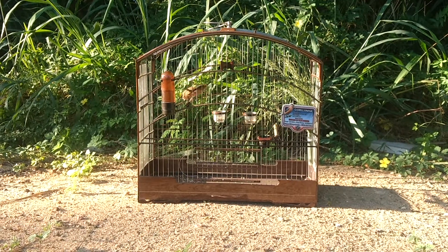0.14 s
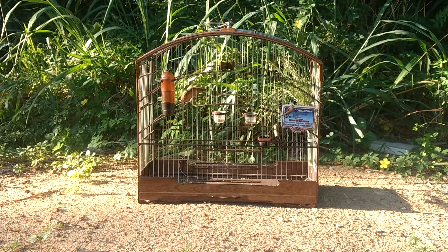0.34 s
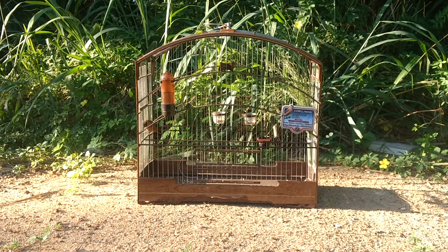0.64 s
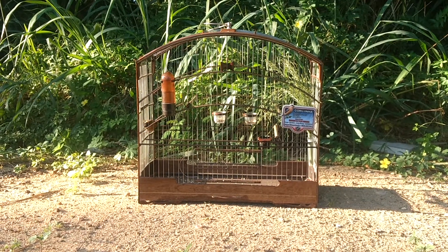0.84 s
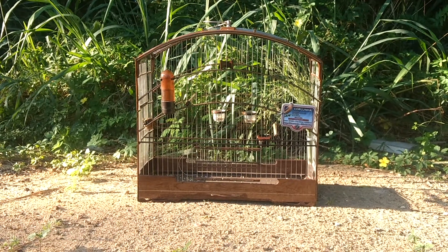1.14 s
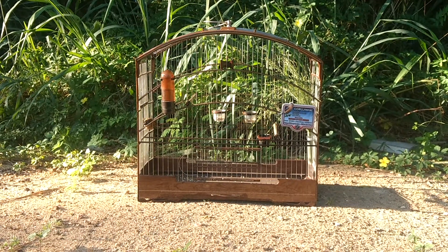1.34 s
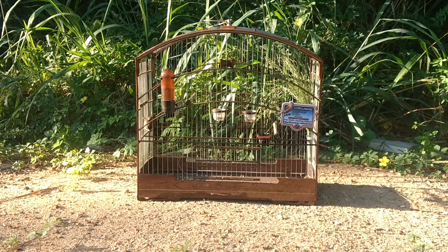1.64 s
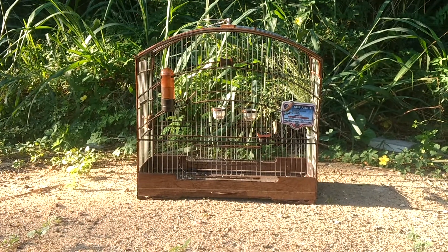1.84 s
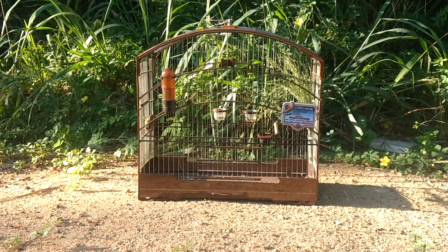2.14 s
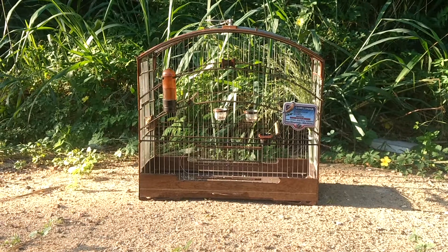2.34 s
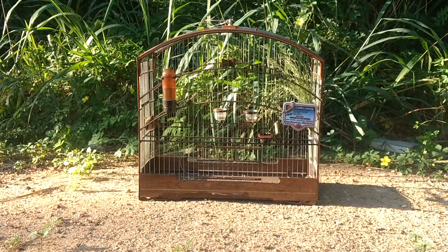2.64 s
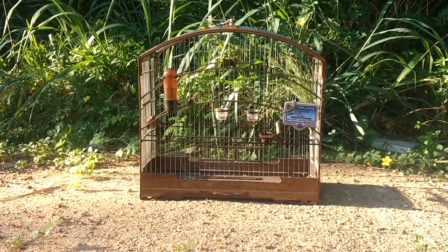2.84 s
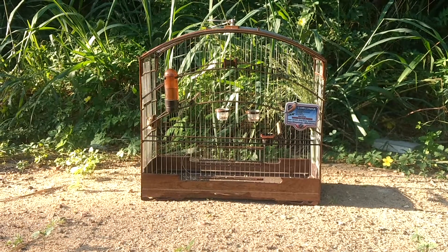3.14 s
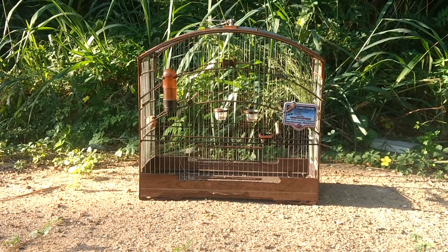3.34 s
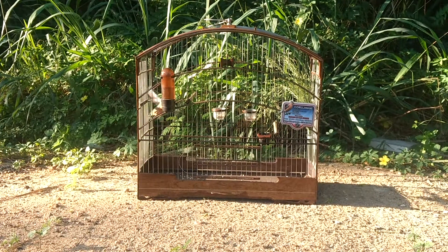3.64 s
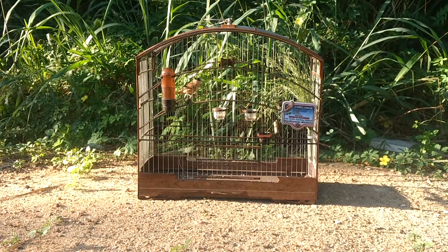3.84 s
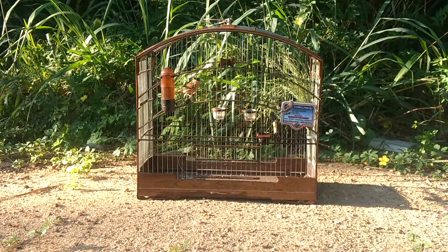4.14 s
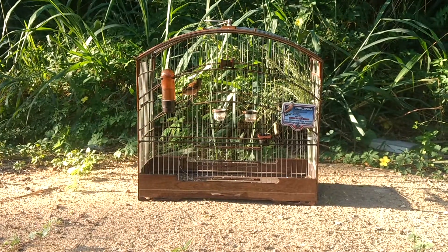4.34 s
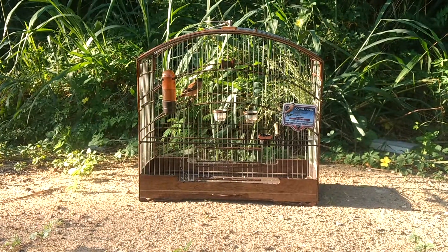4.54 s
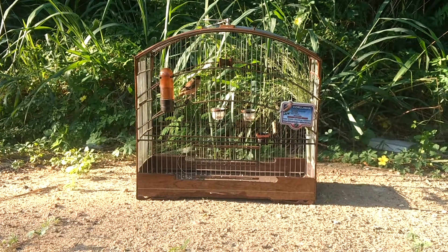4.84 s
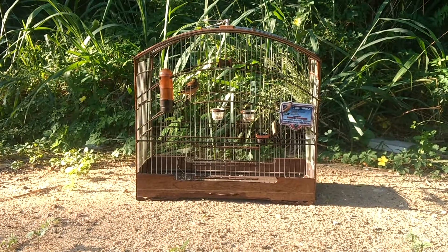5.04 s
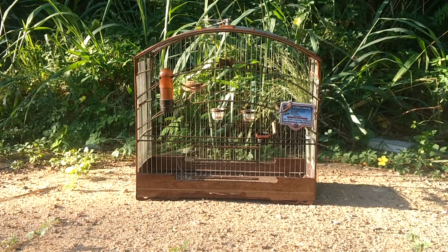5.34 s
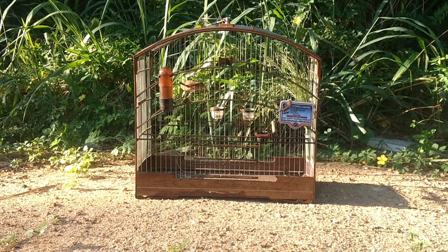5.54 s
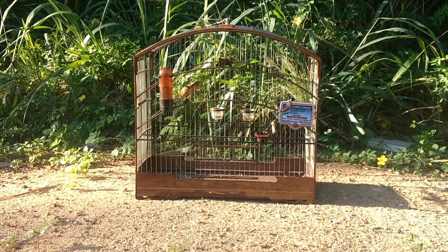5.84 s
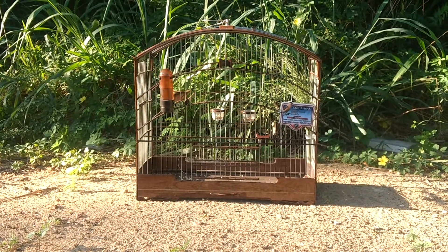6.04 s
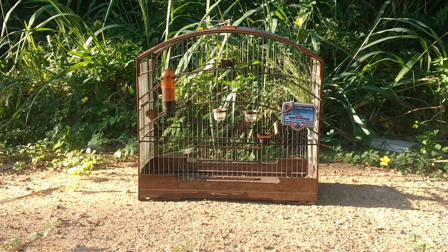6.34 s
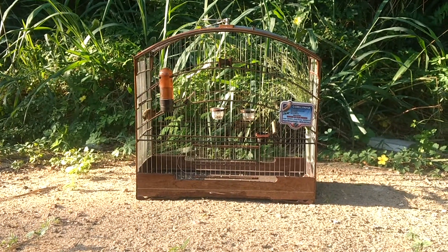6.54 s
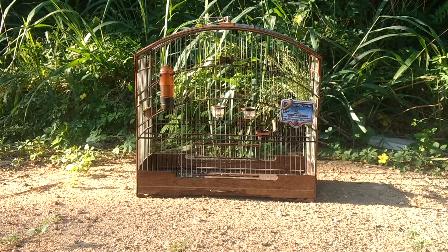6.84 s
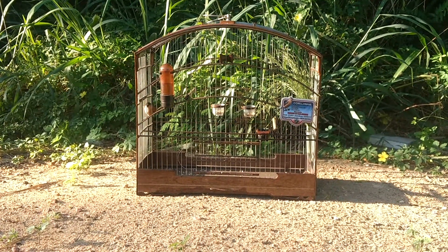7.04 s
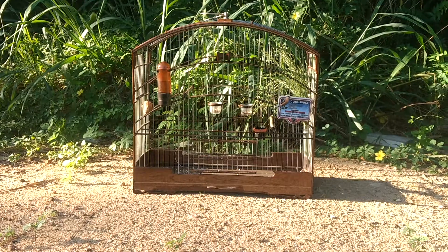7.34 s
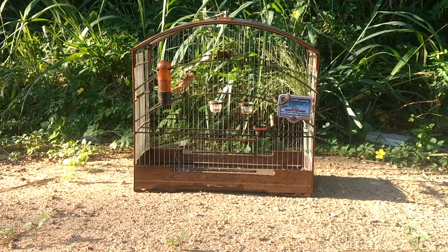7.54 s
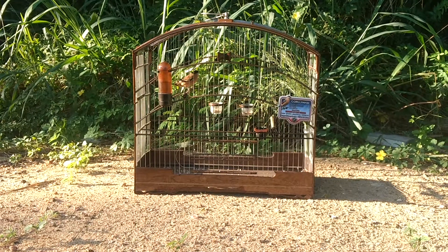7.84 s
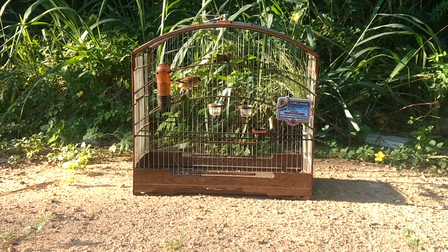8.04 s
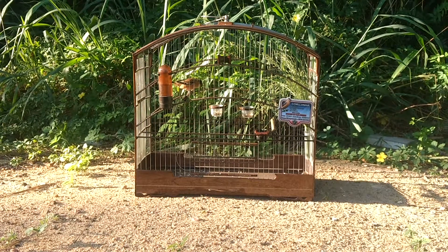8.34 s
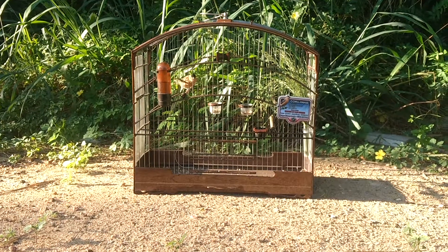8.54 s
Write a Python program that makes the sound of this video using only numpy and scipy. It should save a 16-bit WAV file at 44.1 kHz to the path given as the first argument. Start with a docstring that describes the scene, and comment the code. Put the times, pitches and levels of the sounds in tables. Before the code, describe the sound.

A small bird in a wire cage outdoors starts with short chirps, buzzy notes and soft ticks. About halfway, a trill and a rasp lead into one loud downward whistle. Another trill follows, then a quick run of sharp notes and a last trill. Insects hold one high pitch over a low rumble of distant traffic, and a far motor faintly pulls away. The sound is very wide, with light reflections.

```python
"""A finch sings in a wire cage on a sunny path; ground, cage and a bank of tall plants reflect it.
Insects drone at one pitch over distant traffic throughout. A far whine fades in the first second,
as the bird starts on short notes, buzzes and soft ticks. Near 4 s a trill and a rasp lead to one
loud falling whistle. A distant motor pulls away; from 6.3 s comes a quick run of sharp notes, then
a last trill. In the treble, left is a slightly late, inverted twin of right: a very wide sound."""
import sys
import numpy as np
from scipy import signal
from scipy.fft import rfft, irfft, next_fast_len
from scipy.io import wavfile
from scipy.ndimage import uniform_filter1d, map_coordinates

SR = 44100
rng = np.random.default_rng(int(sys.argv[2]) if len(sys.argv) > 2 else 0)


def to_wav(sig):
    """Store sig (one row per channel, or 1-D mono) as 16-bit WAV at the path in sys.argv[1].

    Samples outside -1..1 are clipped; the rate is SR.
    """
    pcm = np.clip(np.atleast_2d(sig), -1, 1) * 32767
    pcm = np.round(pcm).astype(np.int16)
    wavfile.write(sys.argv[1], SR, pcm.T)  # frames by channels


N = 383669


def amp(db):
    """Decibels to gain."""
    return 10 ** (np.asarray(db) / 20)


def along(points, hz):
    """Read (Hz, value) points on a log axis."""
    point_hz, values = np.transpose(points)
    return np.interp(np.log(hz + 1), np.log(point_hz), values)


def wobble(rate_hz, size):
    """Smooth random curve, rate_hz knots a second."""
    knots = np.random.default_rng(rng.integers(2 ** 31)).standard_normal(int(size * rate_hz / SR) + 4)
    return map_coordinates(knots, [np.arange(size) * rate_hz / SR])


def cycles(hz):
    """Running phase of a frequency curve, in radians."""
    return 2 * np.pi * np.cumsum(hz) / SR


def filtered(x, response):
    """Apply a frequency response to x."""
    size = next_fast_len(N + SR // 2)
    return irfft(rfft(x, size) * response(np.fft.rfftfreq(size, 1 / SR)), size)[..., :N]


def add(track, start_s, sound):
    """Mix a sound into the track."""
    start = max(0, round(start_s * SR))
    track[start:start + len(sound)] += sound[:max(0, N - start)]


def stereo_noise(gain):
    """Noise of rms 1 shaped by gain(hz); the channels are least alike in the bass."""
    # Each row: frequency in Hz, left-right coherence.
    coherence = [(60, 0.14), (300, 0.39), (600, 0.66), (1000, 0.94), (3000, 0.83), (6000, 1), (9000, 1)]

    def mid_side_gain(hz):
        angle = np.arccos(np.clip(along(coherence, hz), -1, 1)) / 2
        return gain(hz) * np.array([np.cos(angle), np.sin(angle)])

    mid, side = filtered(rng.standard_normal((2, N)), mid_side_gain)
    noise = np.array([mid + side, mid - side])
    return noise / np.sqrt(np.mean(noise ** 2))


def arch(crest_s, in_s, out_s, from_hz, main_hz, to_hz, db, bend, fade_db, late=0):
    """Note as (s, Hz, dB) points: pitch bends and level fades off the crest; late delays the peak."""
    u = np.linspace(-1, 1, 41)
    times_s = crest_s + u * np.where(u < 0, in_s, out_s)
    pitch = main_hz + (np.where(u < 0, from_hz, to_hz) - main_hz) * np.abs(u) ** bend
    return np.column_stack([times_s, pitch, db - fade_db * np.abs(u - late) ** bend])


def contour(note, jitter, shimmer_db):
    """Per-sample pitch in Hz and amplitude of a note, both trembling, with soft ends."""
    s, hz, db = np.transpose(note)
    size = max(round((s[-1] - s[0]) * SR), SR // 200)
    t = s[0] + np.arange(size) / SR
    pitch = uniform_filter1d(np.interp(t, s, hz), SR // 250) * (1 + jitter * wobble(350, size))
    ends = np.clip(np.minimum(t - t[0], t[-1] - t) / .0035, 0, 1)
    return pitch, np.sqrt(2) * ends * amp(np.interp(t, s, db) + shimmer_db * wobble(164.5, size))


def roughened(pitch, rough):
    """Irregular vibration shakes the pitch, about 5 % per unit of roughness."""
    return pitch * (1 + .05 * rough * wobble(600, len(pitch)))


def syrinx(pitch, second_db, third_db):
    """The bird's voice: a nearly pure tone with two weak overtones."""
    phase = cycles(pitch)
    return sum(amp(db) * np.sin(k * phase) * (k * pitch < SR / 2)
               for k, db in enumerate((0, second_db, third_db), 1))


def clear_tone(note, second_db, third_db, jitter=.003, break_rough=0):
    """Clean glide; high pitches strain, rough and bright, and may crack between registers."""
    break_hz, break_width_hz, strain_db = 5480, 230, 5
    pitch, level = contour(note, jitter, shimmer_db=.7)
    strain = np.clip((pitch - 4700) / 1800, 0, 1)
    crack = break_rough * np.exp(-((pitch - break_hz) / break_width_hz) ** 2)
    pitch = roughened(pitch, .3 * strain + crack)
    return level * syrinx(pitch, second_db + strain_db * strain, third_db)


def insects(centre_hz=5310, width_hz=300, level_db=-51):
    """A far chorus merges into one narrow, steady band."""
    band = stereo_noise(lambda hz: 1 / (1 + ((hz - centre_hz) / width_hz) ** 2 / 2) ** 2)
    return band * amp(level_db + .28 * wobble(1.78, N))


def engine_hum():
    """A far engine draws nearer; its tones waver in pitch and level."""
    # Each row: frequency in Hz, level at mid-scene in dB, change over the scene in dB.
    tones = [(135.5, -55, 2), (161, -50.8, 5), (258, -58, 0), (314, -55, 8), (478, -67, -4)]
    approach = np.linspace(-.5, .5, N)
    out = np.zeros(N)
    for hz, db, change_db in tones:
        level = np.sqrt(2) * amp(db + change_db * approach + 2 * wobble(5, N))
        out += level * np.sin(cycles(hz + .8 * wobble(5, N)))
    return out


def traffic_and_air(rumble_db=-41.5, rise_db=1.5, air_db=-47.5):
    """Slowly swelling rumble and engine hum, a little to the left, and the even hiss of open air."""
    # Each row: frequency in Hz, relative noise density in dB.
    traffic_spectrum = [(20, -37), (40, -32), (50, -23.5), (65, -13.5), (85, -4), (105, -7.5), (135, -1),
                        (160, 0), (200, -2), (260, -5.5), (400, -11), (600, -16), (1200, -27.5),
                        (3000, -49.5)]
    air_spectrum = [(300, -51), (700, -1.5), (1100, 2), (1900, 1), (2400, -2), (3000, -8.5), (3600, -12.5),
                    (4400, -11.5), (6200, -16), (7000, -21), (7700, -24), (10000, -26.5), (15000, -42)]
    level = amp(rumble_db + np.linspace(0, rise_db, N) + .58 * wobble(7.1, N))
    rumble = level * stereo_noise(lambda hz: amp(along(traffic_spectrum, hz)))
    air = amp(air_db) * stereo_noise(lambda hz: amp(along(air_spectrum, hz)))
    return (rumble + engine_hum()) * amp([[1.3], [-1.3]]) + air


def whine(end_s=.85, from_hz=850, to_hz=806, level_db=-59):
    """A faint, far whine sags in pitch and fades out."""
    out = np.zeros(N)
    pitch, level = contour([(0, from_hz, level_db), (end_s, to_hz, level_db)], jitter=.015, shimmer_db=2)
    add(out, 0, level * signal.windows.tukey(len(level), .3) * np.sin(cycles(pitch)))
    return out


def whistles(thin_above_hz=6700, thin_db_per_octave=55):
    """Clear notes glide through a main pitch; the voice thins at the top of its range."""
    # Each row: crest time, lead-in and lead-out in s, start, main and end pitch in Hz, level in dB.
    notes = [ (.006, 0.0075, .033, 2860, 2620, 1950, -43), (.397, .016, 0.06, 5880, 5570, 5590, -31.5),
             (.45, 0.024, 0.16, 5660, 5590, 5560, -45), (1.953, .012, 0.013, 2870, 2735, 2330, -43.5),
             (6.278, 0.036, .022, 3300, 3600, 3670, -46), (6.582, .014, .016, 3550, 3670, 3700, -37),
             (6.611, 0.022, 0.022, 3720, 3935, 3820, -35), (6.848, 0.0099, .016, 3540, 3630, 3680, -36),
             (6.879, 0.02, 0.026, 3800, 3910, 3900, -34), (6.952, 0.013, 0.018, 5740, 5480, 5530, -37),
             (6.974, .012, 0.01, 4260, 5220, 5150, -27), (6.983, 0.011, 0.011, 5160, 5070, 4800, -24),
             (7.014, 0.024, 0.019, 5100, 5020, 4550, -24), (7.157, 0.064, 0.022, 7600, 6240, 6260, -27.5),
             (7.222, 0.016, 0.029, 4190, 4334, 3220, -28), (7.261, .025, 0.042, 3320, 3316, 2920, -32),
             (7.273, 0.024, 0.03, 2580, 2946, 2340, -32.5), (7.29, 0.012, .012, 4280, 4300, 4250, -41),
             (7.416, .025, .008, 4970, 5280, 4800, -28), (7.424, 0.0068, 0.0078, 6270, 5680, 5330, -30),
             (7.435, 0.015, 0.016, 4940, 4570, 5400, -26.5), (7.456, .009, 0.0074, 4230, 4420, 3800, -20.5),
             (7.474, 0.0096, 0.0088, 4410, 4360, 4370, -30), (7.63, .03, 0.043, 1880, 1954, 2030, -44.5),
             (8.6, 0.1, 0.18, 1880, 2017, 1890, -45.5), ]
    out = np.zeros(N)
    for row in notes:
        s, hz, db = arch(*row, bend=1.4, fade_db=12.5).T
        thinning_db = thin_db_per_octave * np.maximum(np.log2(hz / thin_above_hz), 0)
        note = np.column_stack([s, hz, db - thinning_db])
        add(out, s[0], clear_tone(note, second_db=-35.5, third_db=-37.5, jitter=.011))
    return out


def cheeps():
    """Faint cheeps, each swelling and fading on one straight glide."""
    # Each row: midpoint and length in s, start and end pitch in Hz, level in dB.
    notes = [(.022, .04, 3450, 3080, -49), (0.069, .05, 3030, 2530, -50), (0.245, .026, 4700, 4100, -55),
             (.91, .04, 4600, 4250, -62), (2.365, .03, 4470, 3880, -55), (2.412, 0.04, 4350, 3950, -55),
             (6.012, 0.032, 5800, 5810, -48), (6.105, .025, 4160, 4200, -52),
             (6.155, .022, 4500, 3820, -53), (7.835, 0.051, 6480, 5740, -55.5),
             (7.91, 0.043, 5630, 5970, -53), (8.336, 0.027, 5870, 6780, -49),
             (8.597, 0.023, 5970, 5750, -47.5)]
    out = np.zeros(N)
    for mid_s, length_s, from_hz, to_hz, db in notes:
        mid_hz = (from_hz + to_hz) / 2
        note = arch(mid_s, length_s / 2, length_s / 2, from_hz, mid_hz, to_hz, db, bend=1, fade_db=5.5)
        pitch, level = contour(note, jitter=.025, shimmer_db=2.5)
        add(out, note[0][0], level * np.sin(cycles(pitch)))
    return out


def nasals():
    """A harmonic stack slides through fixed throat resonances; the last note jumps register and back."""
    # Each row: crest time, lead-in and lead-out in s, start, main and end fundamental in Hz,
    # level before the throat in dB, roughness.
    arches = [(.29, .135, .105, 1100, 1520, 1336, -47, 0.52), (4.57, .32, .17, 760, 1113, 826, -44.5, 0.2)]
    # Each row: time in s, fundamental in Hz, level before the throat in dB.
    yodel = [(7.65, 990, -47), (7.684, 1190, -40), (7.704, 1240, -38), (7.711, 1350, -34.5),
             (7.752, 1405, -36), (7.798, 1412, -45), (7.804, 1280, -39), (7.842, 1225, -43.5),
             (7.882, 1030, -49)]
    # Each row: frequency in Hz, throat gain in dB.
    throat = [(1100, -36), (1700, -18), (1970, -1), (2800, 0), (3000, -8), (3450, -13), (3800, -23),
              (4200, -15), (4550, -18), (5000, -32), (6300, -22), (7200, -38), (8400, -42), (13000, -44)]
    out = np.zeros(N)
    notes = [(arch(*shape, bend=2.3, fade_db=7), rough) for *shape, rough in arches]
    for note, rough in notes + [(yodel, 0)]:
        pitch, level = contour(note, jitter=.005, shimmer_db=1.5)
        phase = cycles(roughened(pitch, rough))
        stack = sum(amp(along(throat, k * pitch)) * np.sin(k * phase) for k in range(1, 10))
        add(out, note[0][0], level * stack)
    return out


def buzzes(in_s=.08, out_s=.038, flutter_hz=112, pitch_depth=.064, level_depth=.52):
    """Rising notes; a fast flutter shakes pitch and level, and a faint grainy band rides above."""
    # Each row: start in s, main pitch in Hz, level in dB.
    notes = [(.185, 2510, -48), (1.841, 2840, -57), (6.455, 2940, -41.5), (6.726, 2973, -39.5)]
    out = np.zeros(N)
    for start_s, hz, db in notes:
        note = arch(start_s + in_s, in_s, out_s, .92 * hz, hz, 1.2 * hz, db, bend=1.92, fade_db=7.5)
        pitch, level = contour(note, jitter=.015, shimmer_db=1.3)
        flutter = cycles(flutter_hz * (1 + .045 * wobble(18, len(pitch))))
        tone = syrinx(pitch * (1 + pitch_depth * np.sin(flutter)), second_db=-22.5, third_db=-32)
        grain = amp(-17) * np.sin(cycles(roughened(1.62 * pitch, rough=1)))
        add(out, start_s, level * (1 + level_depth * np.cos(flutter)) * (tone + grain))
    return out


def ticks():
    """Contact calls plunge from a thin top to a faint low tail in about 50 ms."""
    # Each row: crest time in s, base level in dB.
    calls = [(0.237, -64), (0.847, -61), (1.136, -65), (1.428, -64), (1.468, -61), (1.848, -59),
             (2.337, -61.5), (3.077, -57), (3.42, -63), (4.03, -64)]
    out = np.zeros(N)
    for s, db in calls:
        note = [(s - .008, 7300, db - 8), (s, 6400, db + 8),
                (s + .008, 5400, db + 6), (s + .04, 4100, db - 10)]
        pitch, level = contour(note, jitter=.045, shimmer_db=2.5)
        add(out, note[0][0], level * syrinx(pitch, second_db=-25, third_db=-31))
    return out


def squeaks():
    """Strained high notes, brightened by their octave."""
    # Each row: crest time, lead-in and lead-out in s, start, main and end pitch in Hz, level in dB,
    # relative octave level before strain in dB.
    notes = [(.374, 0.014, 0.021, 5400, 6370, 7400, -34.5, -28),
             (5.876, 0.007, 0.025, 7100, 7840, 7260, -48, -20),
             (5.884, .009, .028, 6200, 6540, 6900, -44, -17),
             (7.382, .04, 0.023, 7400, 6930, 7050, -37.5, -24),
             (7.405, 0.0073, .011, 6750, 6880, 7000, -30, -27)]
    out = np.zeros(N)
    for *shape, octave_db in notes:
        note = arch(*shape, bend=1.34, fade_db=12)
        add(out, note[0][0], clear_tone(note, second_db=octave_db, third_db=-36, jitter=.011))
    return out


def held_whistles(scoop_share=.1003, scoop_s=.0392, sag_share=.046):
    """Soft whistles scoop up to pitch, hold their level and sag a little."""
    # Each row: start and length in s, pitch in Hz, level in dB, roughness.
    notes = [(1.456, .122, 2666, -52.5, 0.77), (2.421, 0.14, 2704, -50, 0.01)]
    out = np.zeros(N)
    for start_s, length_s, hz, db, rough in notes:
        t = np.linspace(0, length_s, 40)
        scoop = np.maximum(1 - t / scoop_s, 0)
        glide_hz = hz * (1 - scoop_share * scoop - sag_share * (t / length_s) ** 2)
        note = np.column_stack([start_s + t, glide_hz, db - 4 * scoop])
        pitch, level = contour(note, jitter=.004, shimmer_db=1)
        add(out, start_s, level * np.sin(cycles(roughened(pitch, rough))))
    return out


def slurs():
    """Notes hook up and slide down; the bird pushes hardest after the turn."""
    # Each row: time of the top, lead-in and lead-out in s, start, top and end pitch in Hz, level in dB.
    notes = [(2.229, 0.0142, .049, 3070, 3490, 2324, -42.5), (7.515, .02, .061, 2390, 3510, 1930, -33.5)]
    out = np.zeros(N)
    for row in notes:
        note = arch(*row, bend=1.3, fade_db=10.5, late=.18)
        add(out, note[0][0], clear_tone(note, second_db=-27, third_db=-38))
    return out


def trills(period_s=.0455, half_flick_s=.011, loudest_share=.72):
    """Even trains of short, hoarse downward flicks that swell and fade."""
    # Each row: start and end in s, pitch in Hz, sweep each way as a share of pitch, peak level in dB.
    trains = [(3.812, 4.18, 3100, .25, -51), (5.056, 5.57, 3350, .22, -45.5),
              (7.886, 8.55, 3450, .33, -47.5)]
    out = np.zeros(N)
    for start_s, end_s, hz, sweep, db in trains:
        for s in np.arange(start_s, end_s, period_s):
            progress = (s - start_s) / (end_s - start_s)
            crest_db = db - 15 * abs(progress - loudest_share)
            note = arch(s, half_flick_s, half_flick_s, hz * (1 + sweep), hz, hz * (1 - sweep),
                        crest_db, bend=1.35, fade_db=13)
            pitch, level = contour(note, jitter=.03, shimmer_db=2)
            add(out, note[0][0], level * np.sin(cycles(roughened(pitch, rough=1.94))))
    return out


def rasp():
    """Irregular vibration roughens a note and adds a band halfway to the octave; it clears as it falls."""
    # Each row: time in s, pitch in Hz, level in dB, roughness.
    points = [(3.936, 2660, -48, 1), (3.955, 3050, -42, 1.1), (3.978, 3200, -39.5, 0.78),
              (3.993, 3077, -37, 0.26), (4.004, 2710, -37, 0.2), (4.011, 1980, -46, .1)]
    out = np.zeros(N)
    s, hz, db, rough = np.transpose(points)
    pitch, level = contour(np.column_stack([s, hz, db]), jitter=.012, shimmer_db=1)
    rough = np.interp(s[0] + np.arange(len(pitch)) / SR, s, np.clip(rough, 0, 1))
    halfway = amp(-6.5) * rough * np.sin(cycles(roughened(1.5 * pitch, 2 * rough)))
    grit = 1 + .5 * rough * wobble(900, len(pitch))
    tone = syrinx(roughened(pitch, rough), second_db=-10, third_db=-36)
    add(out, s[0], level * grit * (tone + halfway))
    return out


def falling_whistle(start_s=4.313, length_s=.241):
    """One loud note drops fast, then ever more slowly, and slips down once more as it stops."""
    floor_hz, span_hz, relax_s = 3834, 3760, .075
    flick_hz, flick_s = 703, .0077
    slip_hz, slip_db, slip_s = 380, 7, .009
    attack_s, hold_s, release_db_per_s = .021, .093, 167
    out = np.zeros(N)
    t = np.linspace(0, length_s, 120)
    slip = np.exp((t - length_s) / slip_s)
    hz = floor_hz + span_hz * np.exp(-t / relax_s) + flick_hz * np.exp(-t / flick_s) - slip_hz * slip
    held_db = -21.5 + 2.5 * np.minimum(t / (attack_s + hold_s), 1)
    attack_db = 30 * np.maximum(1 - t / attack_s, 0)
    release_db = release_db_per_s * np.maximum(t - attack_s - hold_s, 0) + slip_db * slip
    note = np.column_stack([start_s + t, hz, held_db - attack_db - release_db])
    add(out, start_s, clear_tone(note, second_db=-34.5, third_db=-39, break_rough=.7))
    return out


def motor():
    """A low, unsteady drone climbs as a far vehicle gathers speed."""
    # Each row: time in s, pitch in Hz, level in dB.
    points = [(4.8, 62, -75), (5.15, 67, -55), (5.7, 74, -59), (7.3, 76.9, -68), (7.9, 83.5, -48),
              (8.7, 89.9, -53)]
    s, hz, db = np.transpose(points)
    t = np.arange(N) / SR
    pitch = np.interp(t, s, hz) * (1 + .045 * wobble(9, N))
    return amp(np.interp(t, s, db) + 2 * wobble(6.4, N)) * np.sin(cycles(pitch))


def reflections(song):
    """Ground and cage give quick, weak copies; the plants scatter a longer tail as the bird turns."""
    # Each row: frequency in Hz, T60 of the plant bank in s.
    bank_t60 = [(2000, 1), (4000, 0.44), (6000, 0.54), (8000, 0.72), (14000, 0.036)]
    # Each row: time in s, relative level sent into the plants in dB.
    facing = [(.4, -2), (3.9, 13.5), (4.3, -9.5), (4.9, -17), (5.8, 6), (7, 3)]
    # Each row: frequency in Hz, reflection gain of cage and leaves in dB.
    scatter = [(2500, 2.5), (4300, 3), (5100, 6), (6500, 7)]

    def echo(response):
        return signal.fftconvolve(song, response / np.linalg.norm(response))[:N]

    t = np.arange(SR // 25) / SR
    near = rng.standard_normal(len(t)) * np.exp(-t / .011) * (t > .001)
    bin_hz, age_s, spectra = signal.stft(rng.standard_normal(SR * 3 // 4), SR, nperseg=256)
    decay = amp(-60 * age_s / along(bank_t60, bin_hz)[:, None])
    _, tail = signal.istft(spectra * decay, SR, nperseg=256)
    facing_db = np.interp(np.arange(N) / SR, *np.transpose(facing))
    echoes = amp(-13) * echo(near) + amp(facing_db - 17) * echo(tail)
    return filtered(echoes, lambda hz: amp(along(scatter, hz)))


def scene():
    """The bird and its reflections, over insects and traffic."""
    song = (whistles() + squeaks() + slurs() + held_whistles() + falling_whistle() + buzzes() + rasp()
            + nasals() + ticks() + trills() + cheeps())
    return song + reflections(song) + insects() + traffic_and_air() + motor() + whine()


def record(dry, lag_s=.000562, corner_hz=890, top_hz=15550):
    """Widening and band limit: the bass stays in phase; above it, left lags and is inverted."""
    def response(hz):
        phase = np.pi * lag_s * np.maximum(hz - corner_hz, 0)
        return np.exp(1j * np.array([-phase, phase])) * (hz < top_hz)

    return filtered(dry, response)


dry = scene()
out = record(dry)
to_wav(out)
```